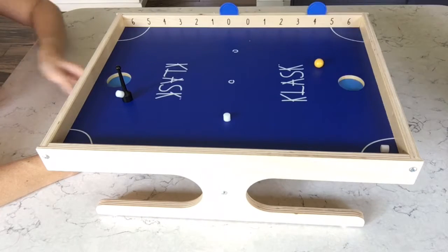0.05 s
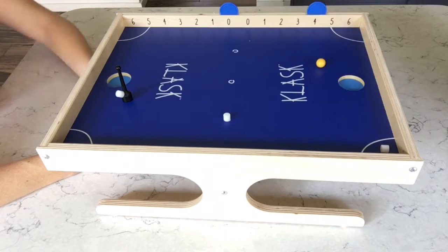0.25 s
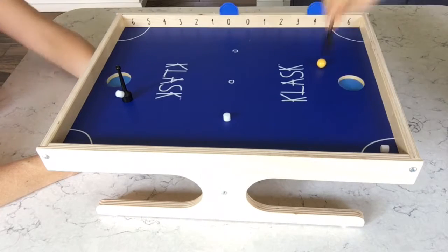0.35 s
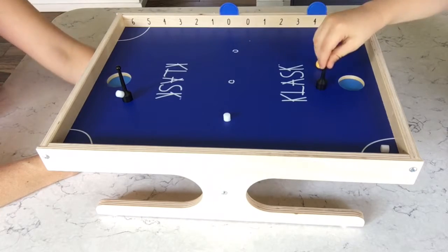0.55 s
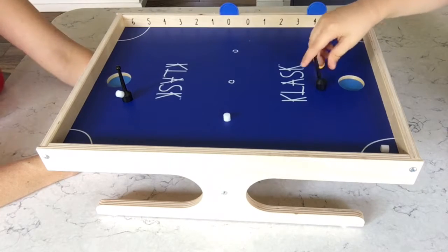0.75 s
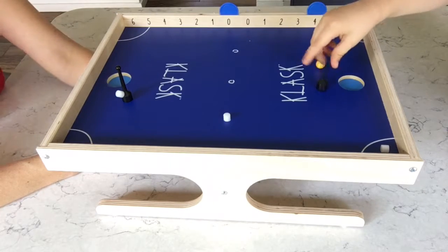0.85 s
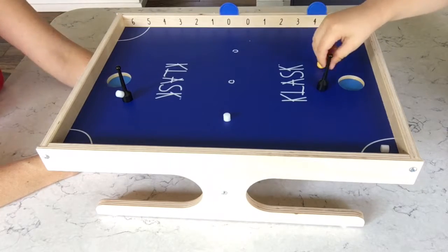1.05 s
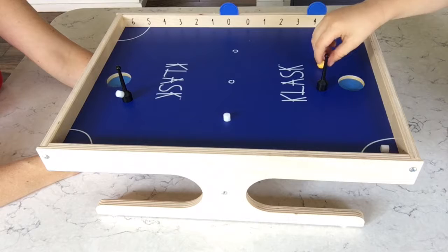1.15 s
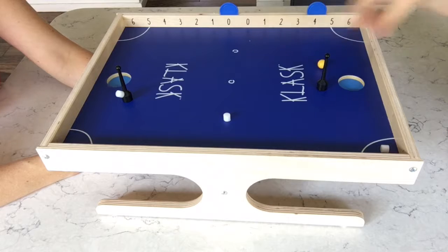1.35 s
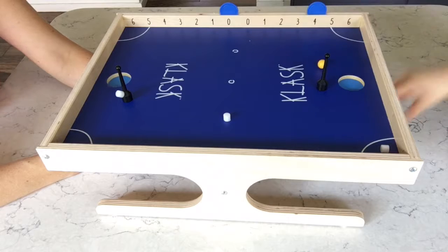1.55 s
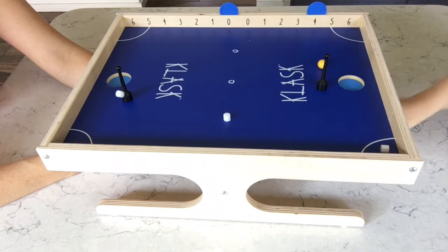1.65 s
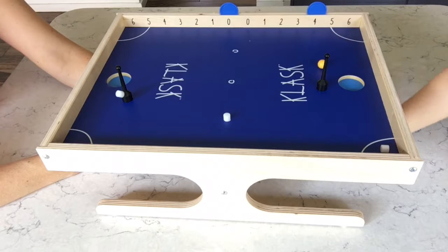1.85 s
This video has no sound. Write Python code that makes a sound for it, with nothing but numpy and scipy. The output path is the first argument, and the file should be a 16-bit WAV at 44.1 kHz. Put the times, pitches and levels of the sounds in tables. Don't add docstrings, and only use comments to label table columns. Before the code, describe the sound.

Plastic game piece drops on a wooden board, clattering in quickening bounces, then spins out with a faint rub

```python
import sys
import numpy as np
from scipy import signal
from scipy.fft import rfft, irfft, next_fast_len
from scipy.io import wavfile
from scipy.ndimage import map_coordinates

SR = 44100
rng = np.random.default_rng(int(sys.argv[2]) if len(sys.argv) > 2 else 0)


def store_wav(level_fs):
    pcm = np.round(np.clip(np.atleast_2d(level_fs), -1, 1) * 32767)
    wavfile.write(sys.argv[1], SR, pcm.T.astype(np.int16))


def nominal_scale(level):
    x = np.asarray(level, float) / 20
    return 10 ** x


N = 83790


def unit(x):
    return x / np.sqrt(np.mean(x ** 2) + 1e-20)


def along(points, hz):
    f, v = np.transpose(points)
    return np.interp(np.log(hz + 1), np.log(f + 1), v)


def filtered(x, response):
    n = x.shape[-1]
    m = next_fast_len(n + 2048)
    return irfft(rfft(x, m) * response(np.fft.rfftfreq(m, 1 / SR)), m)[..., :n]


def wobble(rate):
    knots = rng.standard_normal(int(N * rate / SR) + 4)
    return map_coordinates(knots, [np.arange(N) * rate / SR])


def ringing(peaks):
    def response(f):
        total = 0
        for k, (hz, width, db) in enumerate(peaks):
            total = total + (-1) ** k * nominal_scale(db) * 1j * f * width / (hz * hz - f * f + 1j * f * width)
        return total
    return response


# frequency in Hz, density in dB per Hz.
AIR_SPECTRUM = [(15, -71), (25, -17), (54, 2), (91, -15.5), (150, -5), (327, -11), (361, -13), (414, -21.5),
                (500, -14), (650, -35), (1100, -120)]
# frequency in Hz, density in dB per Hz.
HISS_SPECTRUM = [(480, -2), (640, -2), (790, -4), (950, -2), (1300, -5.5), (2600, -10), (6300, -21),
                 (10500, -35), (16400, -35.5)]


def background():
    low, high = rng.standard_normal((2, N))
    air = filtered(low, lambda f: nominal_scale(along(AIR_SPECTRUM, f) - 60 * (f > 520)))
    air = unit(nominal_scale(0.83 * wobble(11.04)) * air)
    hiss = unit(filtered(high, lambda f: nominal_scale(along(HISS_SPECTRUM, f) - 60 * (f < 480))))
    hum_hz = 49.2 + 1.4 * wobble(4.5)
    hum = nominal_scale(-58.5 - 3.5 * wobble(8.7)) * np.sin(2 * np.pi * np.cumsum(hum_hz) / SR)
    return nominal_scale(-56.5) * air + nominal_scale(-63) * hiss + hum


def drone():
    band = ringing([(139.4, 14, 0)])
    tone = filtered(rng.standard_normal(N), lambda f: band(f) ** 2)
    return nominal_scale(-63) * unit(nominal_scale(9.1 * wobble(5)) * tone)


# frequency in Hz, width in Hz, level in dB.
BOARD_MODES = [(624.7, 53, -10.5), (771.4, 25, -5.5), (939.8, 32, 3.5), (1256, 81, -1), (1482.5, 58, 5),
               (1753, 120, -8), (1900, 49, 4.5), (2218, 69, -7), (2621, 98, 3), (3030, 650, -8),
               (3402, 65, -1.5), (1850, 1270, -7)]
BOARD_TOP_HZ = 4300


def board(f):
    lowpass = 1 + 1j * f / BOARD_TOP_HZ / 0.7 - (f / BOARD_TOP_HZ) ** 2
    return ringing(BOARD_MODES)(f) / lowpass ** 2


# frequency in Hz, level in dB, T60 in seconds.
SHELL_MODES = [(5243, -1, 0.026), (3366, -11.5, 0.04)]


def shell_ring(t):
    ring = np.zeros(len(t))
    for hz, db, t60 in SHELL_MODES:
        luck_db, detune = rng.standard_normal(2) * [2, 0.006]
        ring += nominal_scale(db + luck_db - 60 * t / t60) * np.sin(2 * np.pi * hz * (1 + detune) * t)
    onset = 1 - np.exp(-t / 0.0014)
    choke = 1 + np.exp(np.minimum((t - 0.0125) / 0.0008, 50))
    return ring * onset / choke


# frequency in Hz, level in dB.
CLICK_SPECTRUM = [(2500, -33), (3500, 1), (4600, 2.5), (6000, 1.5), (7500, -0.5), (8500, -14.5),
                  (10000, -37)]
# frequency in Hz, level in dB.
SPARKLE_SPECTRUM = [(7000, -32.5), (8900, -2), (10400, -13), (12100, -1), (13400, -12.5), (15100, -4),
                    (16400, -17.5)]
CHATTER_S, CHATTER_RISE_S, CHATTER_T60, SPARKLE_T60 = 0.0027, 0.00069, 0.006, 0.0058
CLICK_DB, SHELL_DB, BOARD_DB, SPARKLE_DB = -2.5, 7, 6, 2.5


def contact(click_db, shell_db, board_db, sparkle_db):
    t = np.arange(SR // 16) / SR
    rise = 1 - np.exp(-t / CHATTER_RISE_S)
    grip = rise * nominal_scale(-60 * np.maximum(t - CHATTER_S, 0) / CHATTER_T60)
    glint = rise * nominal_scale(-60 * t / SPARKLE_T60)
    chatter = rng.standard_normal((3, len(t))) * [grip, grip, glint]

    shell = nominal_scale(SHELL_DB + shell_db) * shell_ring(t)
    far = shell * np.exp(-t / 0.005)
    out = np.array([shell, far * np.linalg.norm(shell) / np.linalg.norm(far)])

    impulse = np.arange(len(t)) == 60
    colours = [lambda f: nominal_scale(along(CLICK_SPECTRUM, f)), board, lambda f: nominal_scale(along(SPARKLE_SPECTRUM, f))]
    levels = [CLICK_DB, BOARD_DB + board_db, SPARKLE_DB + sparkle_db]
    for noise, colour, db in zip(chatter, colours, levels):
        near, blow = filtered(np.array([noise, impulse]), colour)
        blow = blow * np.linalg.norm(near) / np.linalg.norm(blow)
        out = out + nominal_scale(db) * np.array([near, blow]) / np.abs(near).max()
    return nominal_scale(click_db) * out


def thud(db, hz, width_hz):
    t = np.arange(SR // 10) / SR
    band = ringing([(hz, width_hz, 0)])
    push = np.sin(np.pi * np.minimum(t * hz / 0.24, 1))
    y = filtered(push, lambda f: band(f) * 1j * f / (hz + 1j * f))
    return np.tile(nominal_scale(db) * y / np.abs(y).max(), (2, 1))


# frequency in Hz, T60 in seconds.
ROOM_DECAY = [(150, 0.34), (400, 0.9), (1000, 0.56), (2800, 0.66), (5200, 0.44), (8000, 0.59),
              (15000, 0.39)]
# frequency in Hz, level in dB.
ROOM_COLOUR = [(150, -2.5), (500, 1), (2000, -0.5), (4500, -6.5), (8000, -5), (15000, -5)]


def room(x):
    hz, t, z = signal.stft(rng.standard_normal(int(0.8 * SR)), SR, nperseg=256)
    decay = nominal_scale(-60 * t / along(ROOM_DECAY, hz)[:, None])
    tail = signal.istft(z * decay, SR, nperseg=256)[1]
    tail = tail * (1 - np.exp(-np.arange(len(tail)) / SR / 0.0027))
    tail = nominal_scale(-4.5) * tail / np.linalg.norm(tail)
    echo = np.arange(len(tail)) == round(0.031 * SR)
    tail += nominal_scale(-14.5) * filtered(echo, lambda f: 1 / (1 + (f / 3500) ** 4))
    return signal.fftconvolve(x, filtered(tail, lambda f: nominal_scale(along(ROOM_COLOUR, f))))


# start in seconds, click peak in dB, then shell, board and sparkle in dB over it.
BOUNCES = [(0.21, -19, -12.5, 3.5, -10.5), (0.4086, -28, -16, 4.5, 6.5), (0.413, -14.5, -1.5, -4.5, -6),
           (0.591, -25, -8, 3, -12), (0.6029, -14, -2.5, -12.5, -14.5), (0.6043, -10, -7, -15.5, -6),
           (0.6782, -35.5, -13, 6, -4.5), (0.7621, -14.5, -1, -12, -19.5), (0.7681, -20.5, -11, -5, -9),
           (0.8188, -39.5, 9, 3, -23), (0.87, -29, -29, -10, -18), (0.8826, -20.5, -36, -6.5, -4.5),
           (0.886, -19.5, -11.5, -8.5, -22), (0.9571, -38, 4, 7, -1), (0.9877, -15, -8, -13, -20.5),
           (1.0061, -33, -16, 1, -5.5)]
# start in seconds, click peak in dB, then shell, board and sparkle in dB over it.
RATTLE = [(1.0544, -24, -11, -7.5, -18), (1.0696, -26.5, -6.5, -4, -7.5), (1.088, -27, -14, -9.5, -26),
          (1.1282, -33, -6, 1, -10), (1.1408, -28, -2, -2.5, -22), (1.16, -32.5, -12, -6, -9),
          (1.2022, -19, -2.5, -10.5, -10.5), (1.2621, -27.5, 1, -5, -7), (1.2942, -40, -2, -2, -14),
          (1.3019, -39.5, 0.5, 1, -7), (1.3285, -37, -18, 0.5, -24.5), (1.3516, -44.5, 7, 7.5, -5),
          (1.372, -41.5, -1, -1, -16), (1.3854, -53.5, 4, 9.5, -8), (1.4, -53.5, 8.5, 7, -2)]
# start in seconds,
# level in dB, pitch in Hz, width in Hz.
THUDS = [(0.2114, -26, 192, 119), (0.2112, -24.5, 506, 205), (0.415, -29.5, 196, 122),
         (0.415, -34, 463, 207), (.592, -27, 356.5, 30), (.5918, -10.5, 2760, 900), (.595, -20, 930, 500),
         (0.2106, -13.5, 2280, 900), (0.2156, -17, 1900, 900), (0.4191, -17.5, 5337, 90),
         (0.2122, -17, 5990, 713), (.592, -23.5, 481, 111), (0.604, -40, 198, 101),
         (0.678, -42.5, 196, 78.5), (0.763, -36.5, 193, 80), (.884, -31, 306, 242),
         (1.007, -35.5, 498, 71.5), (1.071, -36.5, 370, 203), (1.203, -37, 392, 248)]
LAG_S = 0.0005
PATHS = 7


def piece():
    hits = [(s + LAG_S, contact(*row)) for s, *row in list(BOUNCES) + list(RATTLE)]
    hits += [(s, thud(*row)) for s, *row in THUDS]
    near, far = np.zeros(N + SR), np.zeros((PATHS, N + SR))
    for k, (s, (direct, blow)) in enumerate(hits):
        start = round(s * SR)
        near[start:][:len(direct)] += direct
        far[k % PATHS, start:][:len(blow)] += blow
    return near[:N] + sum(room(path[:N])[:N] for path in far)


# time in seconds, level in dB.
ROLL = [
    (1.15, -81),
    (1.28, -53),
    (1.4, -51),
    (1.465, -53.5),
    (1.5, -76),
]


def rolling():
    s, db = np.transpose(ROLL)
    grit = rng.standard_normal((3, N)) * nominal_scale(1.5 * wobble(60))
    ring = ringing([(SHELL_MODES[0][0], 150, 0)])
    fizz = ringing([(14600, 2500, 0)])
    layers = [board, ring, lambda f: fizz(f) ** 2]
    mix = sum(nominal_scale(g) * unit(filtered(x, c)) for x, c, g in zip(grit, layers, [0, -5, -16]))
    return nominal_scale(np.interp(np.arange(N) / SR, s, db, left=-120, right=-120)) * mix


def scene():
    return (background() + drone() + piece() + rolling())[None]


def top_cut(x):
    return signal.sosfilt(signal.butter(12, 16960, fs=SR, output="sos"), x)


def record(dry):
    mix = filtered(dry, lambda f: 1 / (1 + (34 / (f + 1)) ** 8) / (1 + (f / 16300) ** 60))
    return top_cut(mix)


dry = scene()
out = record(dry)
store_wav(out)
```